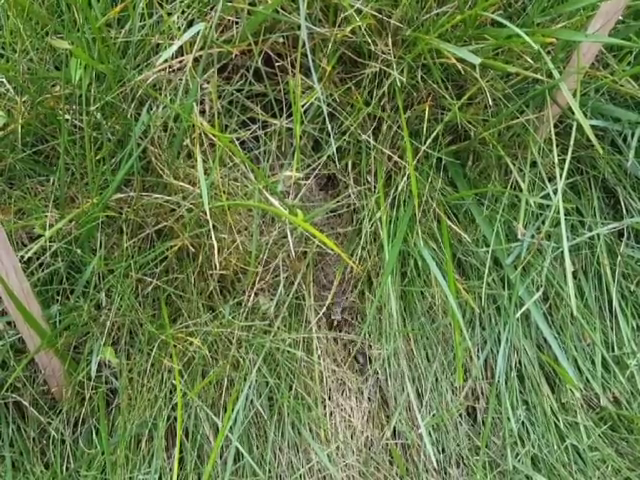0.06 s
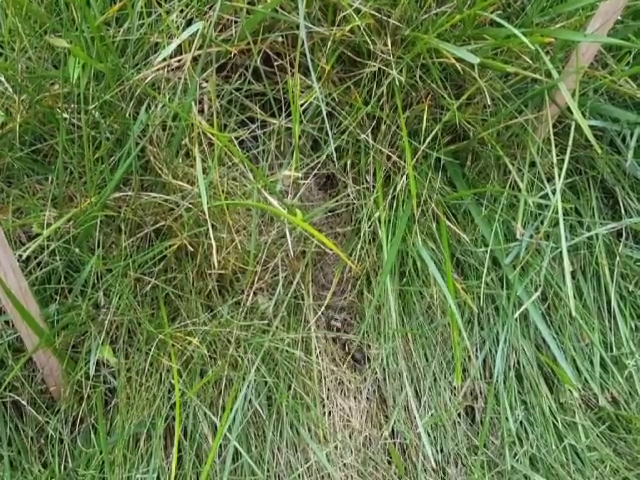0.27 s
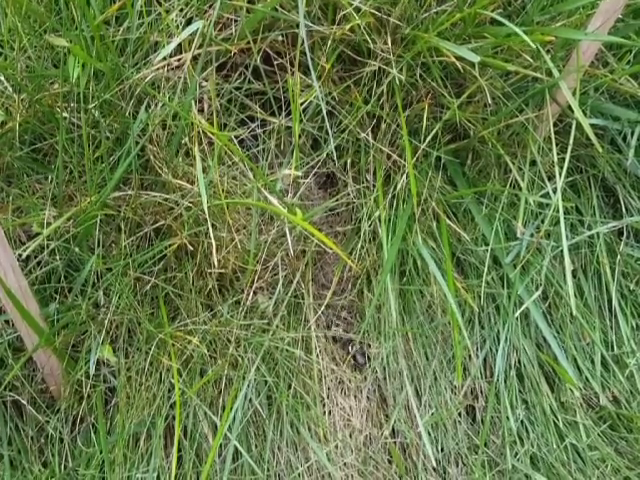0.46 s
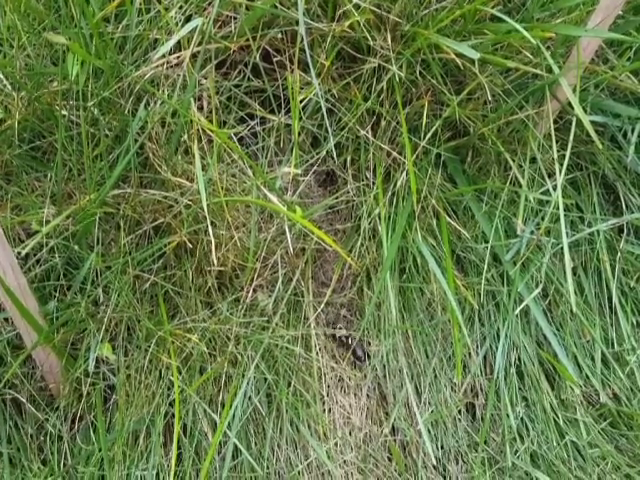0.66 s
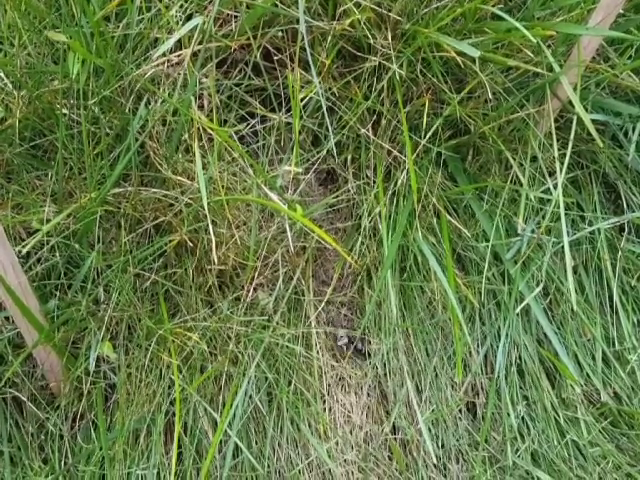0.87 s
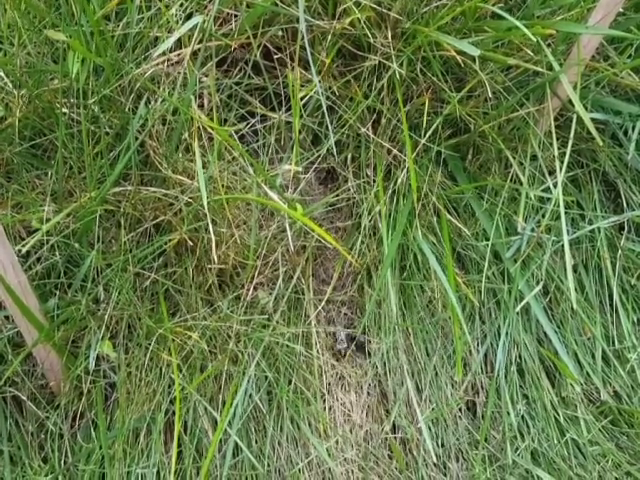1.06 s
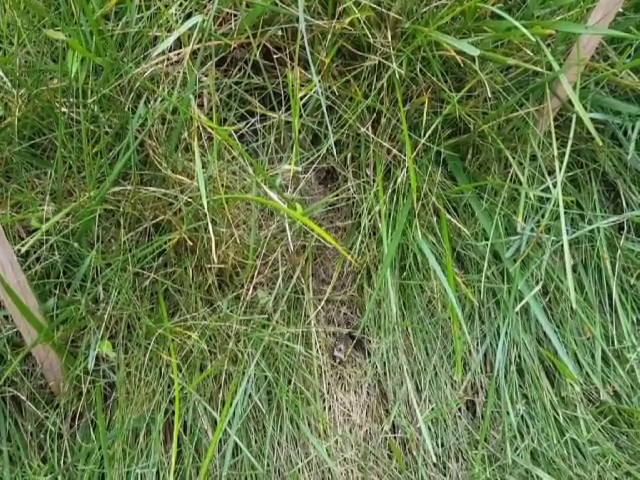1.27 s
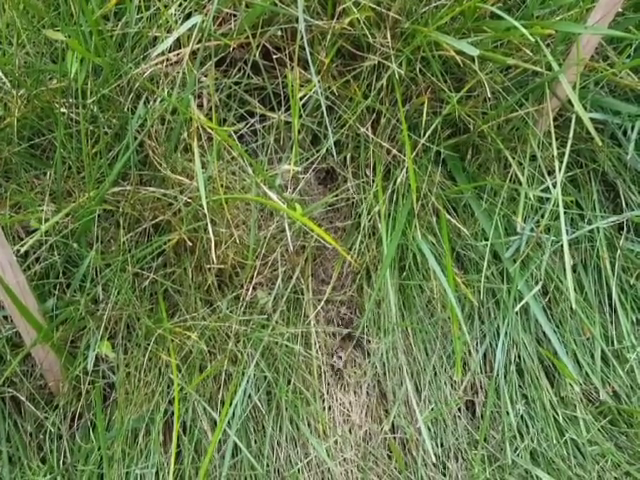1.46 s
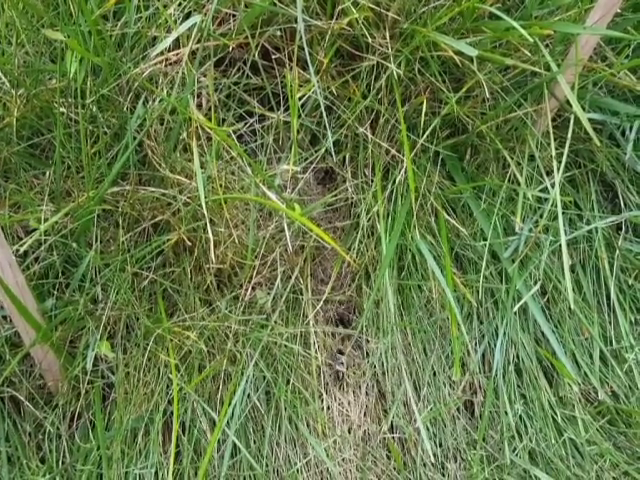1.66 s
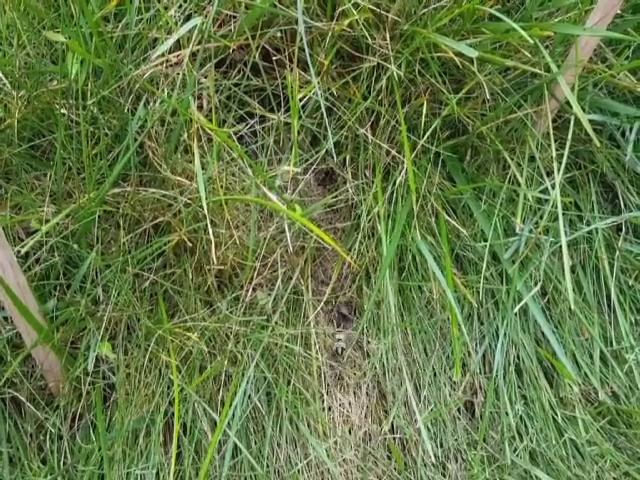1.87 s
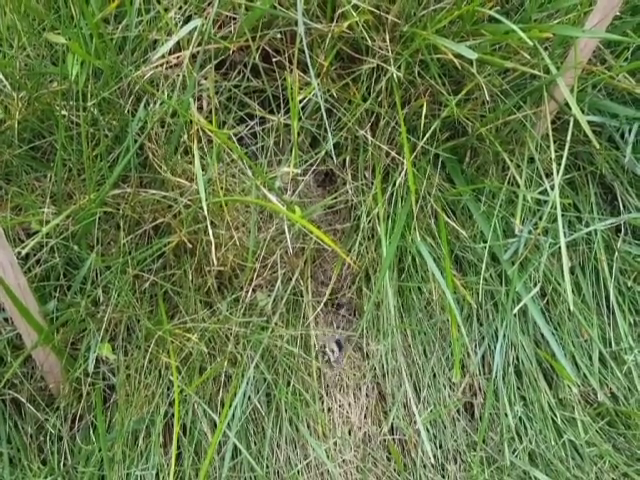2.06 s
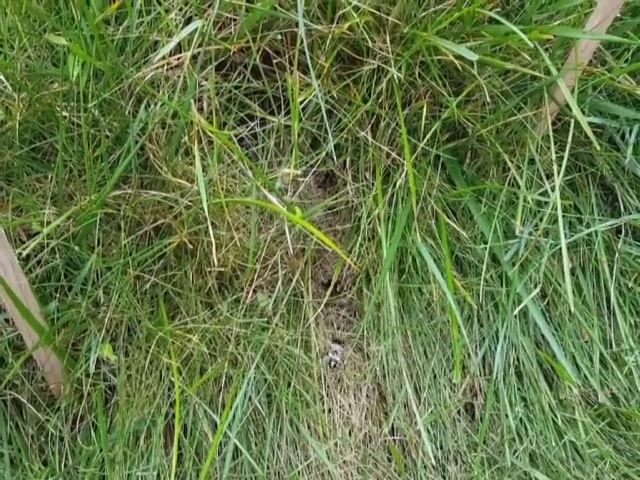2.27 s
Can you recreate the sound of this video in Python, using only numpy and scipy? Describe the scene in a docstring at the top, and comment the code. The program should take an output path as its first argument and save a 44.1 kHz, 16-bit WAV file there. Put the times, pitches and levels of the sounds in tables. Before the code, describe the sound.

Outdoors, stereo microphone in the grass: soft air and distant motor hum, then a sudden loud woody thud reaching the left first, weaker bumps and echo dying away, tiny ticks, and lastly a very faint bee.

```python
"""Wooden bangs over a quiet lawn

Something heavy and wooden bangs, reaching the left ear first: struck modes ring, noise bursts crack,
and feedback delays rumble out between house walls. Near the end a bumblebee buzzes as wingbeat overtones.
A far motor hums as a few sines under the hiss of leaves and grass, made of banded noise.
Tiny tuned ticks and a brief high rustle come from the grass."""
import sys
import numpy as np
from scipy import signal
from scipy.io import wavfile
from scipy.ndimage import uniform_filter1d

SR = 44100
rng = np.random.default_rng(int(sys.argv[2]) if len(sys.argv) > 2 else 0)


def waveform_to_disk(signal):
    """Save audio, clipped to [-1, 1], as 16-bit WAV at the path in sys.argv[1]."""
    frames = np.transpose(np.atleast_2d(signal))
    scaled = np.clip(frames, -1, 1) * 32767
    samples = np.round(scaled).astype(np.int16)
    wavfile.write(sys.argv[1], SR, samples)


N = 101430  # samples, 2.3 s


def amp(db):
    """Decibels to an amplitude factor."""
    return 10 ** (np.asarray(db) / 20)


def rms_one(x):
    """Scale to an rms of 1."""
    return x / np.sqrt(np.mean(x ** 2) + 1e-20)


def in_time(rows):
    """Draw straight lines between timed rows, one curve per column after the time."""
    s, *columns = np.transpose(rows)
    return [np.interp(np.arange(N) / SR, s, column) for column in columns]


def at_hz(points, hz):
    """Read a curve over log frequency."""
    point_hz, values = np.transpose(points)
    return np.interp(np.log(hz), np.log(point_hz), values)


def band_pass(x, low_hz, high_hz):
    """Keep only what lies between two frequencies."""
    return signal.sosfilt(signal.butter(2, [low_hz, high_hz], "band", fs=SR, output="sos"), x)


def high_pass(x, hz):
    """Take out what lies below a frequency."""
    return signal.sosfilt(signal.butter(2, hz, "high", fs=SR, output="sos"), x)


def drift(rate_hz):
    """Slow random wander of rms 1: noise through two equal low-pass poles, drawn every 40 samples."""
    r = np.exp(-2 * np.pi * rate_hz * 40 / SR)
    noise = rng.standard_normal(N // 40 + 2002)
    slow = signal.lfilter([1], [1, -2 * r, r * r], noise)[2000:]  # skip the settling
    return np.interp(np.arange(N) / 40, np.arange(len(slow)), rms_one(slow - slow.mean()))


def fade(t60):
    """Factor per sample that falls 60 dB in t60 seconds."""
    return amp(-60 / (t60 * SR))


def ring(clicks, hz, t60):
    """Two-pole resonator: a unit click sets a decaying sine of starting height 1 ringing."""
    r, w = fade(t60), 2 * np.pi * hz / SR
    return signal.lfilter([0, np.sin(w)], [1, -2 * r * np.cos(w), r * r], clicks + 1e-18)


# How alike left and right are in the noises: (frequency [Hz], correlation [-1 to 1])
LIKENESS = [(60, .97), (130, .95), (290, .85), (620, .4), (1300, -.4), (2500, .1), (4000, .01)]


def banded_noise(spectrum, patchy_db):
    """Third-octave bands of stereo noise, each with its own level, flicker and likeness; rms 1."""
    out, together = 0, drift(6)
    edges = 14900 / 2 ** np.arange(9.34, -.01, -1 / 3)
    white = rng.standard_normal((2, 2, N))
    for k, (low, high) in enumerate(zip(edges, edges[1:])):
        mid, side = band_pass(white[k % 2], low, high)  # neighbouring bands use separate noise
        hz = np.sqrt(low * high)
        alike = np.clip(at_hz(LIKENESS, hz), -1, 1)
        flicker_db = patchy_db * (0.31 * together + drift(14.2))
        gain = amp(at_hz(spectrum, hz) + flicker_db)
        out = out + gain * (np.sqrt(1 + alike) * mid + np.sqrt(1 - alike) * side * [[1], [-1]])
    return rms_one(out)


RIGHT_DB = 2  # right over left


def tilt(right_db):
    """Left and right factors that set the right channel louder by right_db."""
    return amp([[-right_db / 2], [right_db / 2]])


def from_left(x, lead_s):
    """Two spaced microphones: the right one hears it later, yet a little louder."""
    n = np.arange(N)
    return np.array([x, np.interp(n - lead_s * SR, n, x)]) * tilt(RIGHT_DB)


# Modes of the wood: (frequency [Hz], relative level [dB], 60 dB decay time [s])
WOOD = [(59.3, -11, 0.13), (91.9, 2, 0.17), (106, 3, 0.14), (120.8, 0.5, 0.05), (145.5, -4.5, 0.077),
        (162, 5.5, 0.11), (186.5, 3.5, 0.17), (217.8, 7.5, 0.13), (243.3, 4, 0.072), (291.7, -3.5, 0.06),
        (391.8, 1, 0.14), (494.4, 1.5, 0.048), (599, 0.5, 0.047), (709, 0, 0.065), (867.6, 5, 0.041),
        (1076.5, -10, 0.13), (2240, -12, 0.027), (2590, -17.5, .05), (3195, -23, 0.022)]
# Blows: (time [s], relative drive of the low modes [dB], favoured pitch [Hz], relative crack level [dB])
BLOWS = [(.243, -11, 206.4, -22), (.254, 1.5, 209.2, -21.5), (.260, -5, 91.7, -41), (.270, -5, 165, -35.5),
         (0.287, -18, 237, -34), (.300, 1, 125, -41.5), (0.329, -15, 244, -39), (.364, -20.5, 198.5, -71),
         (.380, -23.5, 105, -61), (.424, -16, 129.6, -59), (0.438, -25, 197.2, -74), (.458, -26, 188, -64),
         (0.475, -19.5, 132.4, -56), (.508, -26.5, 196.5, -44), (.522, -28, 159.5, -57),
         (0.539, -28.5, 173.4, -64), (.570, -13, 192.8, -43), (0.578, -28.5, 104, -56),
         (0.603, -17.5, 142.4, -57), (.622, -28, 237.6, -48), (0.648, -30.5, 199, -52),
         (0.679, -31.5, 186, -47.5), (0.716, -26, 181, -73), (0.725, -22.5, 99, -64),
         (0.734, -21, 172, -53.5), (0.757, -24, 151.6, -66), (0.783, -31, 104.5, -59.5),
         (0.834, -37, 200, -62), (.855, -34.5, 140, -64), (.874, -32.5, 97, -81), (1.955, -29, 280, -53.5),
         (2.036, -39, 194.5, -61.5)]
FAVOUR_OCTAVES = 0.094  # spread around the favoured pitch
SWELL_CYCLES = 1.1  # 60 dB decay of the resonator that softens each onset
SCATTER_DB = 1.5  # random spread of each mode at each blow
BRIGHT_FROM_HZ, LOWEST_HZ = 350, 48
CHATTER_S, CHATTER_PER_S = .02, 2000  # decay constant, mean rate of the small contacts


def thuds():
    """Blows swell into low modes near their favoured pitch; bright modes follow crack and chatter."""
    s, low_db, favour_hz, crack_db = np.transpose(BLOWS)
    chance, out = rng.standard_normal((len(s), len(WOOD))), 0
    for k, (hz, mode_db, t60) in enumerate(WOOD):
        if hz < BRIGHT_FROM_HZ:
            octaves_off = np.log2(hz / favour_hz)
            strength = amp(low_db) * np.exp(-.5 * (octaves_off / FAVOUR_OCTAVES) ** 2)
        else:
            strength = amp(crack_db)
        clicks = np.zeros(N)
        clicks[(s * SR).astype(int)] = strength * amp(mode_db + SCATTER_DB * chance[:, k])
        if hz >= BRIGHT_FROM_HZ:
            chatter = signal.lfilter([1], [1, -np.exp(-1 / (CHATTER_S * SR))], clicks + 1e-18)
            contacts = rng.random(N) < CHATTER_PER_S / SR
            clicks = clicks + 0.19 * chatter * rng.standard_normal(N) * contacts
        swell_s = SWELL_CYCLES / hz
        swelling = ring(clicks, hz, swell_s)
        # the factor offsets the gain of two resonators in a row
        out = out + 2 * (1 - fade(swell_s)) * ring(swelling, hz, t60)
    return high_pass(out, LOWEST_HZ)


# Colour of the crack: (frequency [Hz], relative level per Hz [dB])
CRACK = [(250, 2), (400, -11), (880, -11), (1120, -15.5), (1300, -19), (2200, -21.5), (3500, -31),
         (6000, -38.5), (8000, -48), (10000, -71.5)]
CRACK_RISE_S, CRACK_T60_S = 0.0034, 0.28
ECHO_T60_S, ECHO_DB = 0.55, -9.5  # the longer, weaker tail
LEFT_LEAD_S = 0.00038
PATCHY_DB = .7  # flicker of the noise bands


def cracks():
    """The bright part of each blow: noise with a short and a long decay, near and scattered off walls."""
    s, _, _, crack_db = np.transpose(BLOWS)
    power = np.zeros(N)
    power[(s * SR).astype(int)] = amp(2 * crack_db)
    rise = int(CRACK_RISE_S * SR)
    power = uniform_filter1d(power, rise + 1, origin=rise // 2)  # rises only from the blow onward
    power = sum(amp(2 * db) * signal.lfilter([1], [1, -fade(t60) ** 2], power + 1e-30)
                for db, t60 in [(0, CRACK_T60_S), (ECHO_DB, ECHO_T60_S)])
    spectrum = [(150, -62)] + list(CRACK)  # little below the crack
    direct = banded_noise(spectrum, PATCHY_DB)
    scattered = banded_noise(spectrum, PATCHY_DB) * tilt(RIGHT_DB)
    near = from_left(rms_one(direct.sum(axis=0)), LEFT_LEAD_S)
    return np.sqrt(np.abs(power)) * (0.16 * near + 0.64 * scattered)


WALLS_T60_S, WALLS_DB, WALL_CUT_HZ = 0.15, -18.5, 1100


def walls(x):
    """House walls: four feedback delays a side, duller on every round."""
    out, dull = np.zeros((2, N)), np.exp(-2 * np.pi * WALL_CUT_HZ / SR)
    lags = (np.geomspace(.023, .061, 8) * SR).astype(int)
    for k, lag in enumerate(lags):
        loop, gain, state = x.copy(), fade(WALLS_T60_S) ** lag, [0.]
        for i in range(lag, N, lag):
            back, state = signal.lfilter([gain * (1 - dull)], [1, -dull], loop[i - lag:i], zi=state)
            loop[i:i + lag] += back[:N - i]
        out[k % 2] += (loop - x) * (-1) ** (k // 2)
    return amp(WALLS_DB) * out


# Colour of the wingbeat overtones: (frequency [Hz], relative level [dB])
WING = [(180, 1), (360, 3), (550, -1), (730, 0), (920, -1), (1100, 0), (1300, -3), (1700, -8), (2200, -17)]
# Course of the bumblebee: (time [s], wingbeat before jitter [Hz], relative level [dB])
BEE = [(1.91, 175, -82), (1.94, 176, -67), (2.01, 174.5, -65), (2.055, 183.5, -62), (2.085, 176.5, -66),
       (2.11, 181, -65), (2.155, 186, -63), (2.19, 170.5, -63), (2.23, 184.5, -63), (2.3, 186, -63)]
WING_JITTER = .0015  # rms share of the pitch
WING_FLUTTER_DB, FLUTTER_PER_S = 1.5, 10
WING_AIR_DB = -9  # air noise before it is shaped into puffs


def bee():
    """Wingbeat overtones on an unsteady pitch, each fluttering in level, and a puff of air on every beat."""
    hz, level_db = in_time(BEE)
    turns = 2 * np.pi * np.cumsum(hz * (1 + WING_JITTER * drift(38))) / SR
    buzz = 0
    for k in range(1, 21):
        overtone_db = at_hz(WING, k * hz) + WING_FLUTTER_DB * drift(FLUTTER_PER_S)
        buzz = buzz + amp(overtone_db) * np.cos(k * turns + rng.normal(0, 0.57))
    air_noise = rms_one(band_pass(rng.standard_normal(N), 250, 2200))
    buzz = buzz + amp(WING_AIR_DB) * air_noise * (.5 + .5 * np.cos(turns)) ** 2
    started = np.arange(N) > BEE[0][0] * SR
    return np.sqrt(2) * amp(level_db) * buzz * started


MOTOR_HZ = 117.45
# Overtones of the hum: (multiple of the base pitch [1], relative level [dB])
MOTOR = [(1, -4), (2, -20.5), (3, -23.5), (4, -28), (5, -27)]
# Course of the hum: (time [s], relative level [dB])
MOTOR_LEVEL = [(0, -47), (.2, -45), (1.0, -51), (1.2, -55), (1.5, -48.5), (1.75, -45.5), (2.05, -42),
               (2.3, -44.5)]
MOTOR_WAVER_DB = 1.0  # at the base pitch; grows with the root of the multiple
OVERTONES_FOLLOW = .4  # share of the level swing that the overtones take


def motor():
    """Far motor: a hum of fixed pitch, each overtone wavering in level by itself."""
    level_db, = in_time(MOTOR_LEVEL)
    swing_db = level_db - level_db.mean()
    turns = 2 * np.pi * MOTOR_HZ * np.arange(N) / SR
    hum = 0
    for k, db in MOTOR:
        follow = 1 if k < 1.5 else OVERTONES_FOLLOW
        overtone_db = db + swing_db * follow + MOTOR_WAVER_DB * k ** .5 * drift(7.0)
        hum = hum + amp(overtone_db) * np.sin(round(k) * turns + rng.uniform(0, 2 * np.pi))
    return np.sqrt(2) * amp(level_db.mean()) * hum


# Colour of the open air: (frequency [Hz], relative level per Hz [dB])
AIR = [(25, -30.5), (50, -4.5), (90, -6.5), (170, -7.5), (250, -14.5), (450, -25.5), (800, -21.5),
       (1300, -26), (2600, -28.5), (4000, -35.5), (7000, -39.5), (10000, -50.5), (12500, -49.5),
       (14500, -33)]
# Course of the open air: (time [s], level [dB])
AIR_LEVEL = [(0, -50), (1.85, -52.5), (2.0, -50), (2.3, -50.5)]
AIR_RIGHT_DB = 2


def air():
    """Bed of low air noise and the hiss of leaves and grass, as gently flickering noise bands."""
    level_db, = in_time(AIR_LEVEL)
    return amp(level_db) * banded_noise(AIR, PATCHY_DB) * tilt(AIR_RIGHT_DB)


# Brief high swell in the grass: (time [s], level [dB], centre [Hz], two standard deviations [s])
RUSTLE = [(2.03, -70.5, 12100, 0.1)]
RUSTLE_WIDTH = 1.16  # band edges as a ratio to the centre


def rustle():
    """Grass rustle: narrow stereo noise under a bell-shaped swell."""
    t, white, out = np.arange(N) / SR, rng.standard_normal((2, N)), 0
    for s, db, hz, length_s in RUSTLE:
        narrow = rms_one(band_pass(white, hz / RUSTLE_WIDTH, hz * RUSTLE_WIDTH))
        out = out + amp(db) * narrow * np.exp(-.5 * ((t - s) / (length_s / 2)) ** 2)
    return out


# Clear small ticks in the grass: (time [s], envelope peak [dB], pitch [Hz])
TICKS = [(1.001, -52, 2760), (1.103, -58, 2500), (1.256, -56, 3100), (1.903, -55, 2620)]
TICK_S = .0016  # standard deviation of the bell-shaped envelope
FAINT_TICKS_PER_S, FAINT_TICK_DB, FAINT_TICK_HZ = 70, -63, 2750  # pitch varies around its value; level is near the loudest, most ticks fall well below


def ticks():
    """Tiny tuned ticks, sines in bell-shaped envelopes: a few clear ones, many faint ones at random."""
    t, out = np.arange(N) / SR, np.zeros(N)
    chance = rng.random((int(FAINT_TICKS_PER_S * N / SR), 3))
    faint_s = chance[:, 0] * N / SR
    faint_db = FAINT_TICK_DB + 4 * np.log(chance[:, 1] + .05)
    faint_hz = FAINT_TICK_HZ * (.88 + .24 * chance[:, 2])
    for s, db, hz in list(TICKS) + list(zip(faint_s, faint_db, faint_hz)):
        near = slice(max(int((s - 4 * TICK_S) * SR), 0), int((s + 4 * TICK_S) * SR))
        since = t[near] - s
        out[near] += amp(db) * np.sin(2 * np.pi * hz * since) * np.exp(-.5 * (since / TICK_S) ** 2)
    return out


def scene():
    """Mix the wooden bangs, their walls, the bee, the motor and the lawn."""
    wood = thuds()
    bangs = from_left(wood, LEFT_LEAD_S) + cracks() + walls(wood)
    hums = from_left(bee(), .00005) + from_left(motor(), .0001)
    lawn = air() + rustle() + from_left(ticks(), .0001)
    return bangs + hums + lawn


LIMIT_DB, RATIO = -13.5, 0.42  # threshold, share of the excess taken off
RELEASE_DB_PER_S = 146  # fall of the held excess, before the ratio
CEILING, RUMBLE_CUT_HZ, CUTOFF_HZ = .95, 44, 14700


def record(dry):
    """A limiter turns loud moments down, rumble is cut, peaks are rounded, the top is cut."""
    peak_db = 20 * np.log10(np.abs(dry).max(axis=0) + 1e-9)
    over_db = np.maximum(peak_db - LIMIT_DB, 0)
    slope = RELEASE_DB_PER_S * np.arange(N) / SR
    held_db = np.maximum.accumulate(over_db + slope) - slope  # instant attack, steady release
    gain = amp(-RATIO * uniform_filter1d(held_db, size=133))
    heard = high_pass(dry * gain, RUMBLE_CUT_HZ)
    heard = CEILING * np.tanh(heard / CEILING)
    return signal.sosfilt(signal.cheby2(30, 60, CUTOFF_HZ, fs=SR, output="sos"), heard)


dry = scene()
out = record(dry)
waveform_to_disk(out)
```